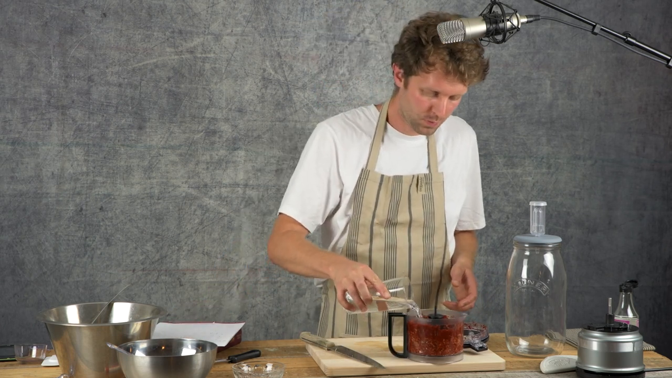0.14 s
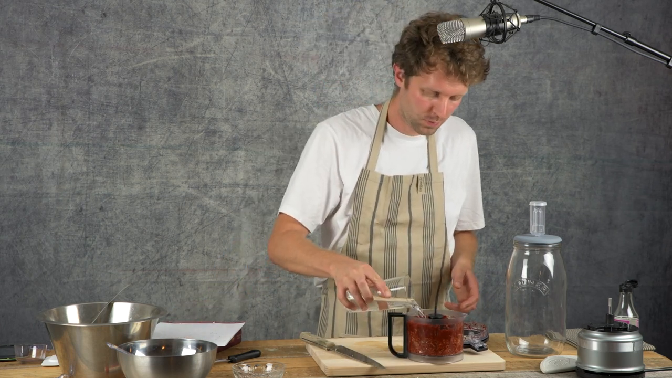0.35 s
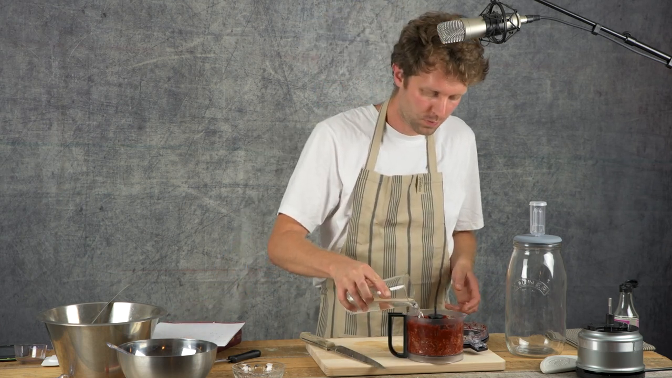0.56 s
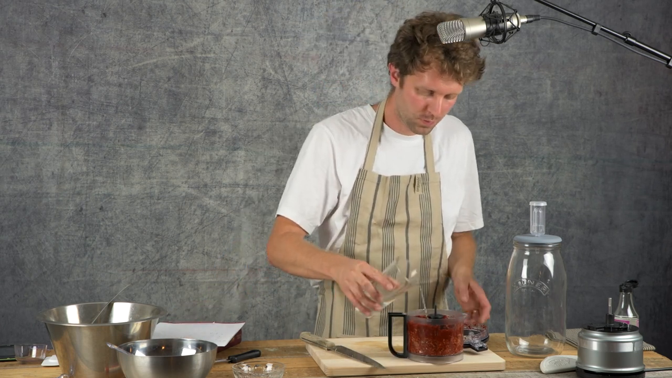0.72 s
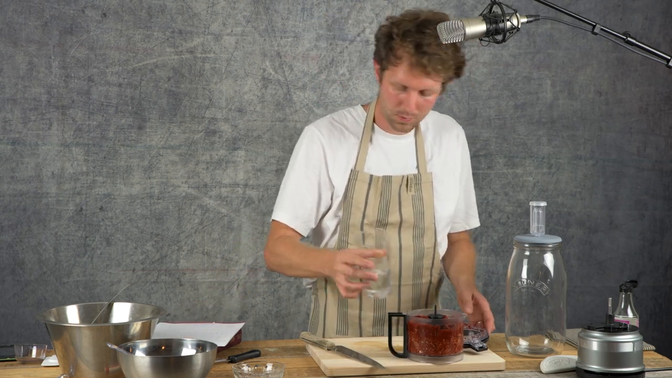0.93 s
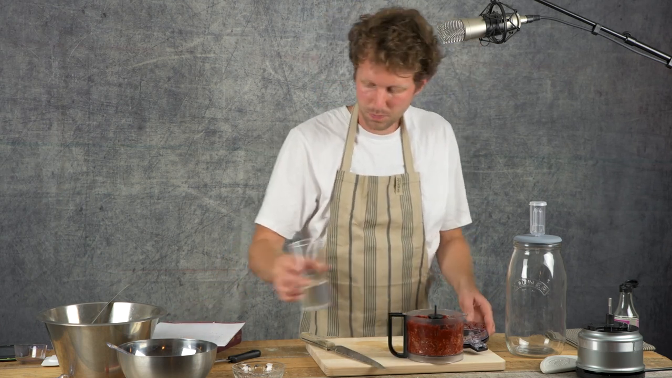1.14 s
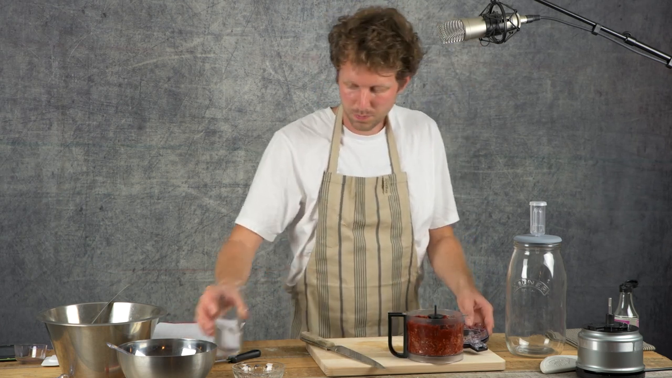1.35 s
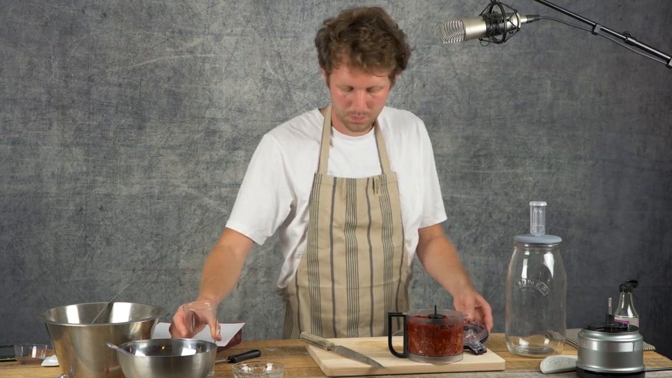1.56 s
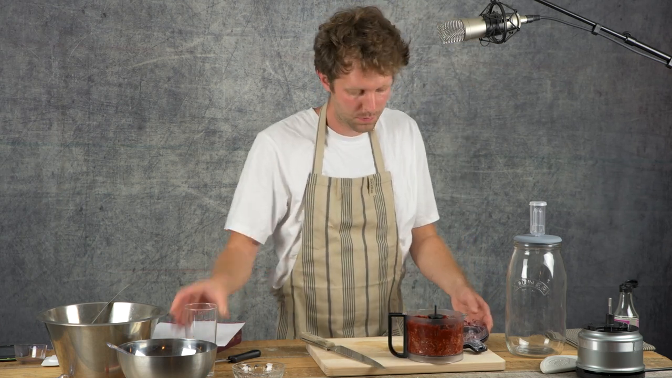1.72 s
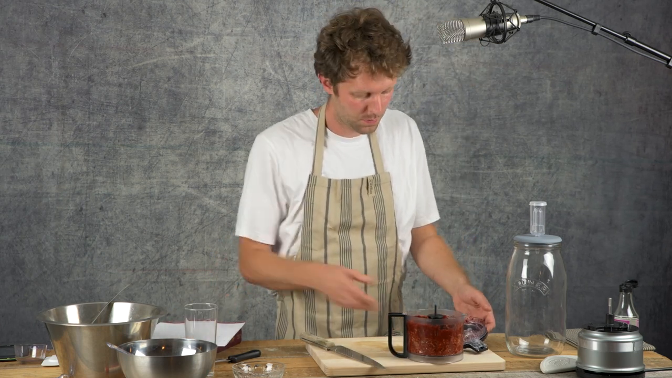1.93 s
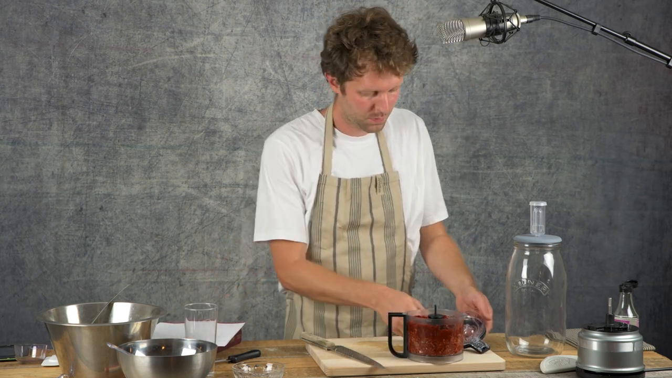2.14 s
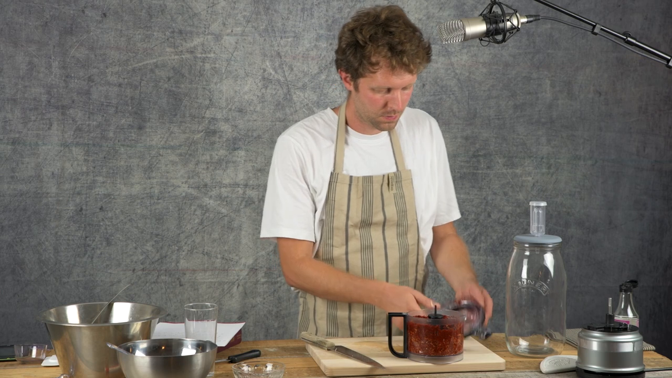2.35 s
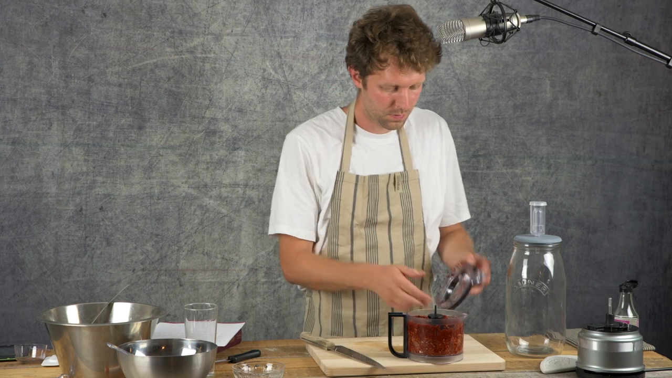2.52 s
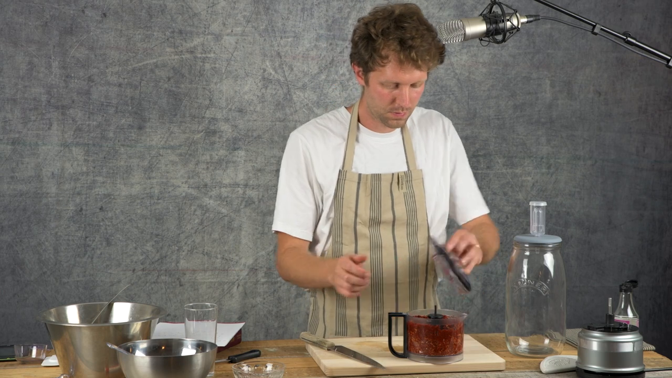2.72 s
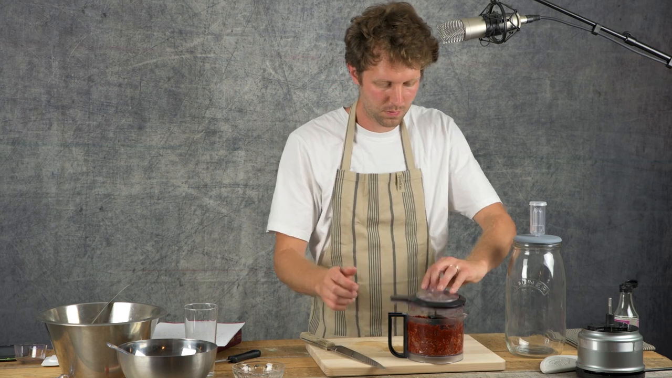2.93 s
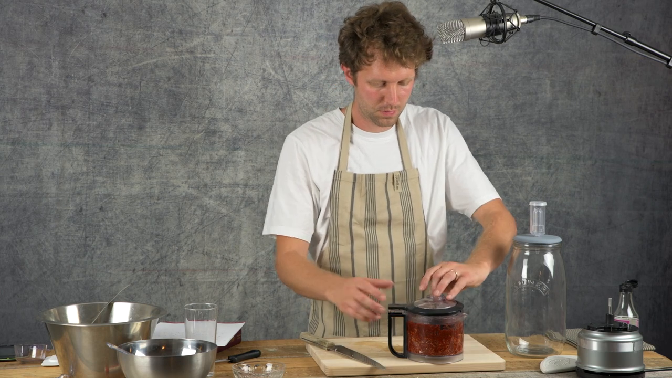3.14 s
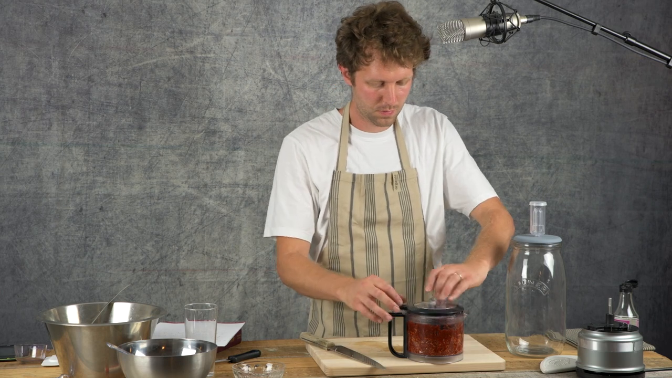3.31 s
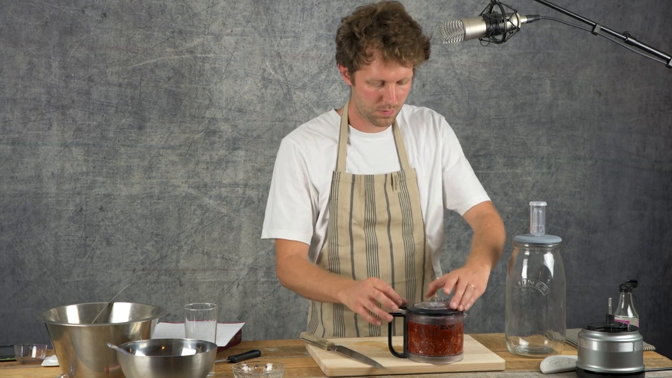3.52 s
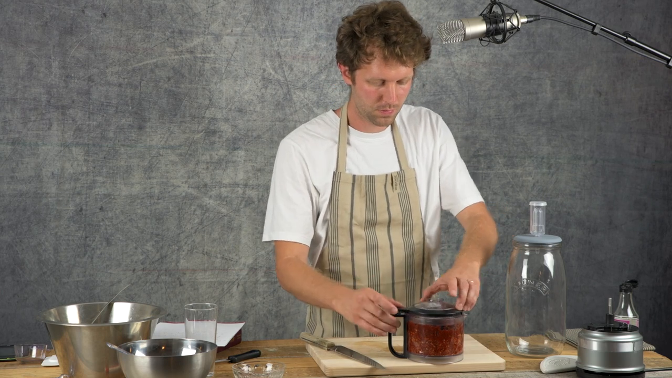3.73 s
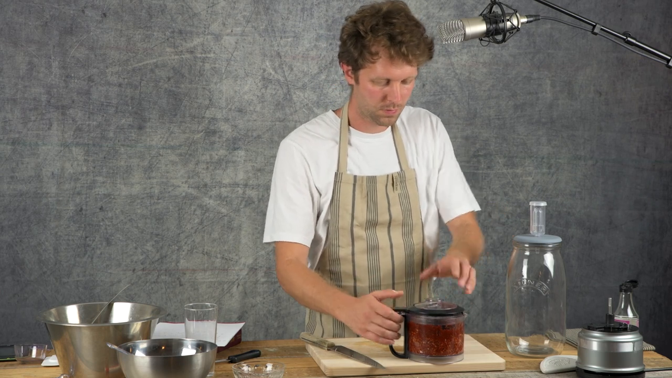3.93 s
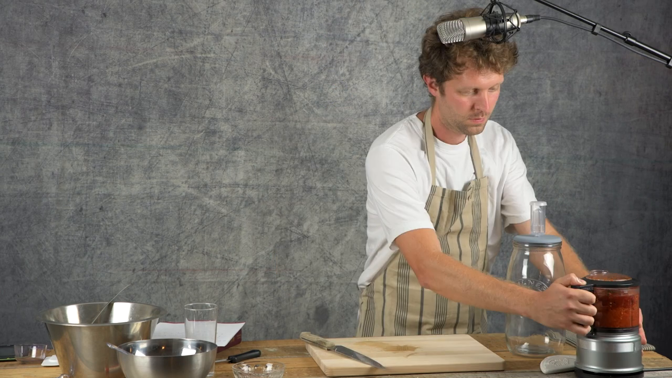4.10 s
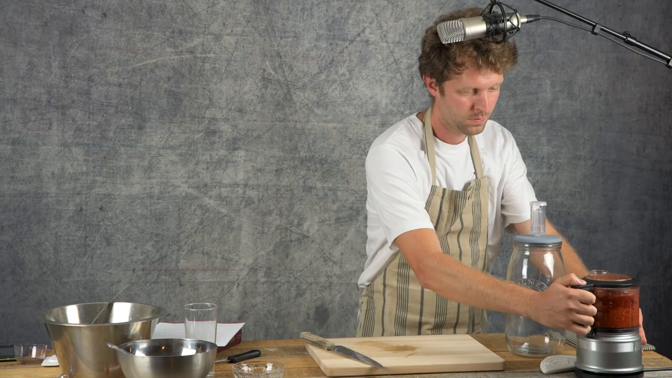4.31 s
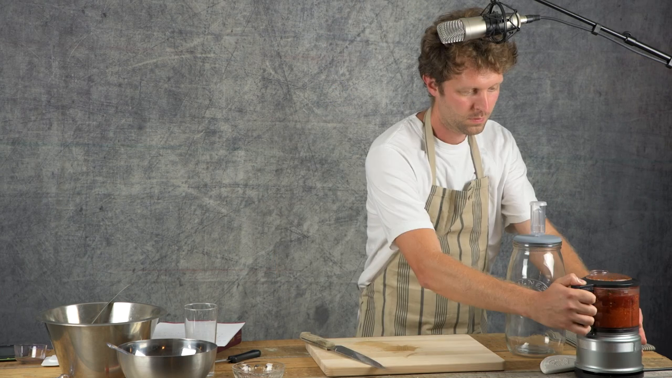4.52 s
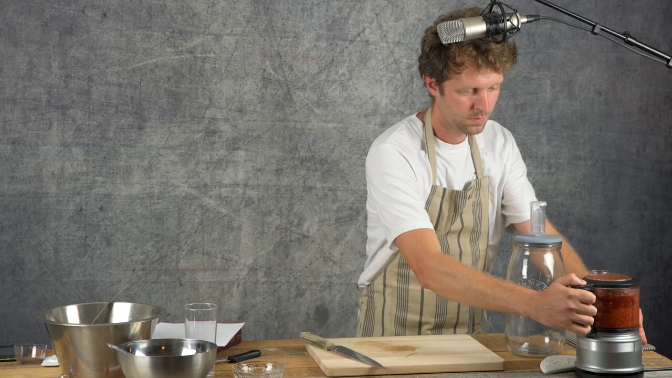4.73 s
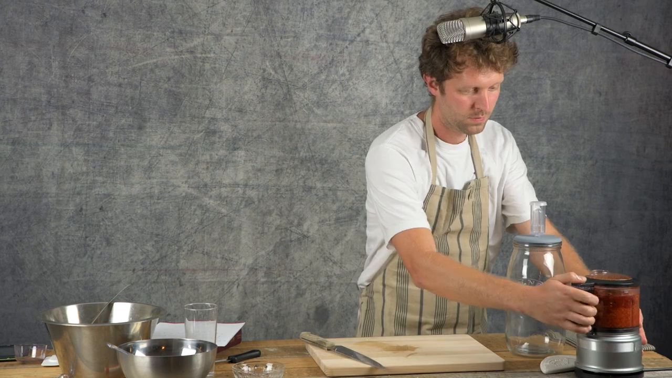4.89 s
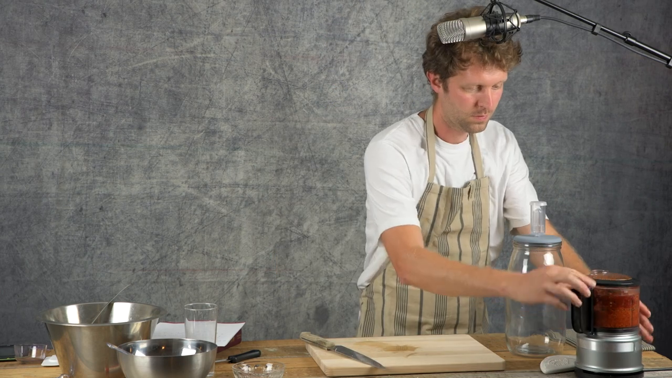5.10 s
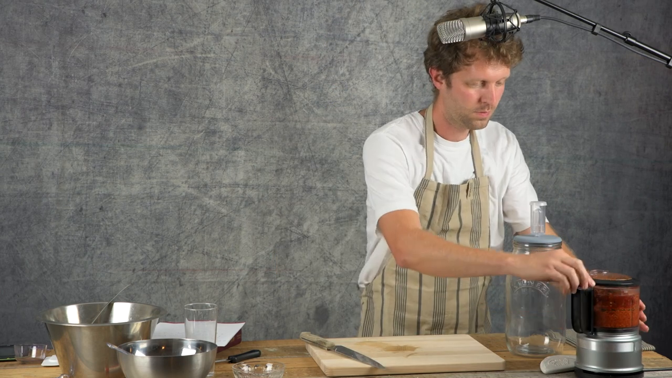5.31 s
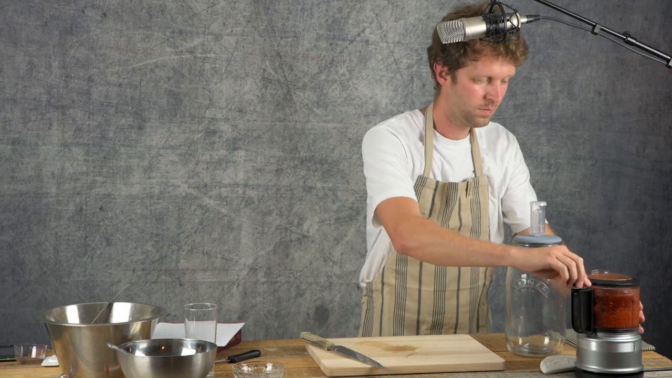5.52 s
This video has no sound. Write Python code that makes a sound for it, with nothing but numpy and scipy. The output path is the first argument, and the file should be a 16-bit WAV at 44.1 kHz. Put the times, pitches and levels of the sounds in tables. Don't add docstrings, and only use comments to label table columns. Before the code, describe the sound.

In a quiet kitchen, drips, glass knocks and plastic lid clacks lead to an abrupt geared motor whir that slows to a stop.

```python
import sys
import numpy as np
from scipy import signal
from scipy.fft import rfft, irfft, next_fast_len
from scipy.io import wavfile
from scipy.ndimage import uniform_filter1d, map_coordinates

SR = 44100
rng = np.random.default_rng(int(sys.argv[2]) if len(sys.argv) > 2 else 0)


def unload_wav(signal):
    wavfile.write(
        sys.argv[1],
        SR,
        np.round(np.clip(np.atleast_2d(signal).T, -1, 1) * 32767).astype(np.int16),
    )


def boost_factor(decibels):
    exponent = np.asarray(decibels, float) / 20
    return 10 ** exponent


N = 244887
CUT_S, OFF_S = 4.172, 5.028

# start in seconds, level in dB, lows over mids in dB, highs over mids in dB.
TABLE_KNOCKS = [
    (1.6685, -35.5, 18.5, -13),
    (1.676, -38, 18, -17),
    (1.683, -39.5, 18.7, -11),
    (1.703, -45.5, 16.6, -14),
    (1.722, -47, 18, -11),
    (1.745, -53.5, 18.5, -13),
    (1.773, -53.5, 16.6, -12),
    (1.795, -56, 15, -9),
]
# start in seconds, level in dB, lows and highs over mids in dB.
LID_KNOCKS = [(3.15, -45, -2, -2), (3.163, -26.5, 4, -11), (3.18, -30.5, 5, -8), (3.202, -30, 1.5, -11),
              (3.225, -49, 19.5, 0), (3.236, -33.5, 2, -10), (3.255, -41, 15, 1), (3.275, -24, 2.5, 0.5),
              (3.329, -52, 1, 9), (3.359, -53, 20.5, 6), (3.395, -57, 16.5, 5)]
# start in seconds, level in dB, lows and highs over mids in dB.
SEATED_KNOCKS = [
    (3.454, -49, 10, -4),
    (3.467, -25, -3.5, -4.5),
    (3.48, -28.5, -1, -10),
    (3.499, -43, 11.5, 1),
    (3.544, -54.5, 11, 7),
    (3.592, -43.5, 3, -11),
    (3.6, -51, 5, -4),
    (3.619, -62.5, 15, 6),
]
# start in seconds, level in dB, lows over mids in dB, highs over mids in dB.
LOCK_KNOCKS = [(3.668, -51.5, 9.5, 4.5), (3.721, -48, 6.5, -15), (3.758, -50, 6.5, -9),
               (3.777, -53.5, 2, -7), (3.812, -45, 4.5, 2.5), (3.829, -30, 5.5, -4.5),
               (3.848, -42.5, 5.5, -8), (3.887, -43, 8, 4), (3.892, -23.5, -2, -5), (3.909, -47.5, 6, -5),
               (3.94, -49, 10.5, -12), (3.96, -49, 13, -8)]


def unit(x):
    return x / np.sqrt(np.mean(np.abs(x) ** 2))


def coloured(points):
    hz, db = np.transpose(points)
    size = next_fast_len(N)
    log_hz = np.log(np.fft.rfftfreq(size, 1 / SR) + 1)
    gain_db = np.interp(log_hz, np.log(hz), db, left=-90, right=-90)
    spectrum = rfft(rng.standard_normal(size)) * boost_factor(gain_db)
    return unit(irfft(spectrum, size)[:N])


def walk(rate_hz):
    steps = uniform_filter1d(rng.standard_normal(N // 16), 2)
    position = np.arange(N) * min(rate_hz, 1300) * 2 / SR
    return map_coordinates(steps, [position], order=1) * np.sqrt(3)


def rough_tone(phase, width_hz):
    return walk(width_hz) * np.sin(phase) + walk(width_hz) * np.cos(phase)


def bandpass(low_hz, high_hz, order):
    return signal.butter(order, [low_hz, high_hz], "bandpass", fs=SR, output="sos")


def ring_down(t, t60_s):
    return np.exp(-np.log(1000) * t / t60_s)


def add(out, start_s, x):
    i = int(start_s * SR)
    out[i:i + len(x)] += x[:N - i]


def background():
    # line in Hz, level in dB.
    hum_lines = [(48.4, -79.5), (95.5, -82), (99.5, -82), (148.5, -74.5), (151.5, -92.5), (199.2, -94.5),
                 (247.6, -84.5), (349.9, -81), (452.2, -87)]
    # frequency in Hz, level in dB.
    hiss_colour = [(25, -32), (45, -10), (70, -7.5), (130, -10), (250, -3.5), (500, -9), (900, -12),
                   (3000, -18.5), (6700, -26), (11000, -32), (12500, -34.5), (16000, -68)]
    t = np.arange(N) / SR
    hum = sum(boost_factor(db + 4 + walk(4)) * np.sin(2 * np.pi * hz * t + k) for k, (hz, db) in enumerate(hum_lines))
    return boost_factor(-68) * coloured(hiss_colour) + hum


def pouring():
    # start in seconds, peak in dB, bubble in Hz, snap over bubble in dB.
    drops = [(0.058, -49.5, 3770, -4.5), (0.0867, -46.5, 4370, -11), (0.089, -50, 2330, -13),
             (0.088, -60, 7740, -17), (0.1042, -46.5, 2010, -10), (0.184, -51, 4720, -13),
             (0.2972, -56, 4080, -13), (0.305, -57, 6500, -8), (0.3272, -38.5, 3100, -15),
             (0.329, -39.5, 4170, -26), (0.362, -60, 9300, -15), (0.3644, -54, 2130, -13),
             (0.372, -47, 7500, -15), (0.3737, -47, 3380, -7), (0.395, -41, 2500, -18),
             (0.398, -55, 5200, -8), (0.4106, -45, 3130, -15), (0.421, -50, 4000, -14),
             (0.4339, -32.5, 3580, -28), (0.435, -37.5, 2250, -23), (0.4456, -36, 2240, -17),
             (0.455, -49, 4800, -12), (0.461, -52, 8000, -3), (0.462, -43.5, 2630, -13),
             (0.4756, -45, 2190, -13), (0.486, -43, 3800, -14), (0.49, -40.5, 4440, -21),
             (0.5127, -43, 3900, -19), (0.517, -56, 5000, -12), (0.5337, -47, 4060, -11),
             (0.5417, -36, 3300, -19), (0.543, -38, 4300, -19), (0.55, -45.5, 2450, -16),
             (0.552, -60, 8200, -12), (0.5744, -68, 3160, -10), (0.591, -62, 5900, -15),
             (0.604, -48, 3800, -15), (0.602, -50, 1610, -17), (0.6174, -60, 4800, -13),
             (0.6394, -55, 3430, -15), (0.674, -57, 7400, -6), (0.8135, -53, 3580, -10),
             (0.941, -69, 1610, 10)]
    # start in seconds, peak in dB, pitch in Hz.
    glugs = [
        (0.544, -54.5, 1020),
        (0.601, -45.5, 956),
        (0.628, -56, 970),
    ]
    out, t = np.zeros(N), np.arange(SR // 20) / SR
    snap_band = bandpass(1600, 6500, 2)
    for start_s, peak_db, hz, snap_db in drops:
        bubble = np.sin(2 * np.pi * hz * t * (1 + 8 * t)) * np.exp(-t * hz / 4) * (1 - np.exp(-t / 0.0004))
        snap = signal.sosfilt(snap_band, rng.standard_normal(len(t)) * np.exp(-t / 0.002))
        add(out, start_s, boost_factor(peak_db) * (bubble + boost_factor(snap_db) * snap / np.abs(snap).max()))
    for start_s, peak_db, hz in glugs:
        swell = np.exp(-t / 0.0074) * (1 - np.exp(-t / 0.0011))
        add(out, start_s, boost_factor(peak_db) * np.sin(2 * np.pi * hz * t) * swell)

    t = np.arange(N) / SR
    start_s, end_s, rise_s, fall_s = 0.31, 0.62, 0.02, 0.055
    flow = np.clip(np.minimum((t - start_s) / rise_s, 1 + (end_s - t) / fall_s), 0, 1)
    splash = coloured([(900, -14), (2200, 0), (3500, 0), (5500, -5), (7500, -14), (10000, -24)])
    splash = splash * boost_factor(4 * walk(500))
    return out + unit(splash) * boost_factor(-66 + 1.5 * walk(10)) * flow


def kitchen(direct, send):
    # frequency in Hz, t60 in seconds, level in dB.
    room = [(60.4, 1, -14), (195, 0.61, -1), (620, 0.49, 0.5), (1800, 0.4, -1.5), (4630, 0.36, -5),
            (11700, 0.26, -10.5)]
    t, tail = np.arange(SR) / SR, 0
    hz, t60_s, db = np.transpose(room)
    for centre_hz in 50 * 2.0 ** np.arange(0, 8.4, 0.5):
        sos = bandpass(centre_hz / 2 ** 0.25, centre_hz * 2 ** 0.25, 2)
        band = signal.sosfilt(sos, rng.standard_normal(SR))
        decay_s = np.interp(np.log(centre_hz), np.log(hz), t60_s)
        level_db = np.interp(np.log(centre_hz), np.log(hz), db)
        tail = tail + boost_factor(level_db) * band * ring_down(t, decay_s) / np.sqrt(decay_s * SR / np.log(1e6))
    tail = tail * (1 - np.exp(-t / 0.00077))
    return direct + signal.fftconvolve(send, tail)[:N]


def knocks(events, body, crack_db, crack_s, top_db, push_s, scatter_db=3, low_hz=270, air_db=-14, detune=0.02,
           loose_rad=1.12, bite_s=0.0014, beam_db=-10, thud_db=-7, size=SR // 8):
    out, t = np.zeros((2, N)), np.arange(size) / SR
    hz, db, t60_s = np.transpose(body)[:, :, None]
    t60_s = np.minimum(t60_s, 70 / hz)
    mode_band = np.digitize(hz[:, 0], [700, 2200, 5500, 10000])
    edges_hz = [(low_hz, 700), (700, 2200), (2200, 5500), (5500, 10000), (10000, 16000)]
    filters = [bandpass(low, high, 3) for low, high in edges_hz]
    for start_s, level_db, weight_db, hard_db in events:
        colour_db = weight_db, 0, hard_db, hard_db + top_db, hard_db + top_db + air_db
        chance = rng.standard_normal((3, len(body), 1))
        contact = rng.standard_normal(size) * np.exp(-t / crack_s) * (1 - np.exp(-t / bite_s)) + 1e-18
        phase = 2 * np.pi * hz * (1 + detune * chance[1]) * t + loose_rad * chance[2]
        modes = boost_factor(db + scatter_db * chance[0]) * np.sin(phase) * ring_down(t, t60_s)
        for k, sos in enumerate(filters):
            ring = signal.sosfilt(sos, modes[mode_band == k].sum(axis=0) * (1 - np.exp(-t / push_s)))
            ring = ring / (np.abs(ring).max() + 1e-18)
            crack = signal.sosfilt(sos, contact)
            crack = boost_factor(crack_db + thud_db * (k == 0)) * crack / np.abs(crack).max()
            gain = boost_factor(level_db + colour_db[k])
            add(out[0], start_s, gain * (ring + crack))
            add(out[1], start_s, gain * (boost_factor(beam_db) * ring + boost_factor(2.5) * crack))
    return out


def glass_tap():
    # start in seconds, level in dB, lows over mids in dB, highs over mids in dB.
    hits = [
        (1.0325, -50, -32, 10.5),
        (1.036, -38.5, -37, -7),
    ]
    # start in seconds, level in dB, lows over mids in dB, highs over mids in dB.
    rebound = [
        (1.11, -50, -14, -25),
    ]
    # mode in Hz, level in dB, t60 in seconds.
    body = [(438, 0, 0.045), (892, 0, 0.047), (975, -2, 0.033), (1130, 11, 0.041), (1210, -8, 0.024),
            (1400, -10, 0.021), (1580, -12, 0.024), (2250, -2, 0.027), (3500, -11, .01), (4080, -1, .016),
            (5070, 12, 0.0078), (6500, 0, 0.0038)]
    tap = knocks(hits, body, crack_db=-5.5, crack_s=0.0041, top_db=-7.5, push_s=0.0014, scatter_db=6,
                 detune=0.004)
    return tap + knocks(rebound, body[:2], crack_db=-16, crack_s=0.003, top_db=-9, push_s=0.002, scatter_db=0)


def glass_handling():
    # start in seconds, level in dB, lows over mids in dB, highs over mids in dB.
    hits = [(1.573, -36.5, -17, 0.5), (1.579, -28, -30, -4), (1.599, -27.5, -18, -15),
            (1.608, -31.5, -12, -5), (1.62, -36.5, -13, -3), (1.757, -38.5, -10, -10.5),
            (2.039, -58, -9, -10), (2.137, -53, -15, -15), (2.196, -36, -17, -8), (2.207, -26, -15.5, -7),
            (2.285, -62, -1, 13), (2.295, -40, -20, -14), (2.618, -84, -2, -4)]
    # mode in Hz, level in dB, t60 in seconds.
    body = [(293, -1.5, 0.027), (478, -2.5, 0.028), (1247, -13, 0.027), (1720, -3.5, 0.021),
            (1775, -0.5, .015), (1950, 4.5, 0.016), (2085, -2, 0.011), (2540, 1.5, 0.013),
            (2870, -3.5, 0.015), (3100, 2.5, 0.012), (3290, 3, 0.013), (3720, -4, 0.0094),
            (4600, -7, 0.005), (7700, 0, .01)]
    return knocks(hits, body, crack_db=-12, crack_s=0.0057, top_db=-32, push_s=0.0057, bite_s=0.0027,
                  beam_db=-8)


def table_thuds():
    # mode in Hz, level in dB, t60 in seconds.
    body = [(120, -33, 0.28), (248, -1, 0.04), (305, 4, 0.035), (375.5, 2, 0.03), (430, 0, 0.025),
            (476, -3.5, 0.025), (549, -2, 0.025), (668, 0, 0.035), (764, 4, 0.07), (866, 1, 0.05),
            (1040, -9, 0.03), (1440, -16, 0.012), (2770, 0, 0.011), (5900, 0, 0.0042)]
    return knocks(TABLE_KNOCKS, body, crack_db=-5, crack_s=0.014, top_db=-25, push_s=0.00052, scatter_db=4,
                  low_hz=173, loose_rad=0.15, detune=0.0073, beam_db=-3, size=SR // 4)


def worktop_sway(events, level_db, rise_s):
    # mode in Hz, level in dB, t60 in seconds.
    bending = [(60, -10, 0.65), (77.3, 0, 1), (104.3, -1, 0.74), (121.7, 6, 0.59)]
    blows, t = np.zeros(N), np.arange(SR) / SR
    for start_s, peak_db, lows_db, *_ in events:
        add(blows, start_s, [boost_factor(peak_db + lows_db + level_db)])
    sway = sum(boost_factor(db) * np.sin(2 * np.pi * hz * t) * ring_down(t, t60_s) for hz, db, t60_s in bending)
    return signal.fftconvolve(blows, sway * (1 - np.exp(-t / rise_s)))[:N]


def rim_tick():
    # start in seconds, level in dB, lows over mids in dB, highs over mids in dB.
    hits = [
        (2.426, -41.5, -19, 4.9),
    ]
    # mode in Hz, level in dB, t60 in seconds.
    body = [(693.3, 0, 0.027), (1765, 3.5, 0.011), (1870, -0.5, 0.023), (2500, 6, 0.011),
            (2860, 3.5, 0.022), (3475, 0, 0.017), (6700, 1, .012), (6950, 2, .012), (7670, 4, .01)]
    return knocks(hits, body, crack_db=-11, crack_s=0.0055, top_db=-8, push_s=0.0013, air_db=-22, beam_db=-5.5)


def loose_lid():
    # mode in Hz, level in dB, t60 in seconds.
    body = [(297, -1.5, 0.04), (414, 5.5, 0.051), (497, -0.5, 0.049), (547, -2.5, 0.056), (861, 0, 0.055),
            (1004, 3.5, 0.024), (1910, 0, 0.024), (2860, -2, 0.02), (3580, 0, 0.014), (4440, 0, 0.0062),
            (7700, 0, 0.0029)]
    return knocks(LID_KNOCKS[:7], body, crack_db=-5, crack_s=0.0066, top_db=-19, push_s=0.0015, scatter_db=1.5,
                  loose_rad=0.54, bite_s=0.00052)


def resting_lid():
    # start in seconds, level in dB, lows over mids in dB, highs over mids in dB.
    switch = [
        (4.16, -64, -17, 3.9),
        (5.278, -66, -8, 25),
    ]
    # mode in Hz, level in dB, t60 in seconds.
    body = [(225, -3, 0.074), (290, 0.5, 0.045), (367, 4, 0.074), (426, 8, 0.026), (580, -6.5, 0.052),
            (810, -7.5, 0.044), (970, 6, 0.026), (1240, -2, 0.024), (1940, 6, 0.024), (3100, 3, 0.045),
            (3350, 5, 0.02), (4050, 6.5, 0.018), (5600, -17, 0.0062), (8100, 1, 0.0029)]
    return knocks(LID_KNOCKS[7:] + switch, body, crack_db=-2.5, crack_s=0.0067, top_db=-17, push_s=0.0016,
                  low_hz=202, bite_s=0.0012)


def seated_lid():
    # mode in Hz, level in dB, t60 in seconds.
    body = [(217, -3.5, 0.058), (296, 0, 0.069), (362, 0, 0.045), (398, -10.5, 0.084), (637, -15, 0.019),
            (828.5, -9.5, 0.073), (1100, -2, 0.018), (1290, -4, 0.02), (1860, -1.5, 0.046),
            (1950, 1, 0.019), (2820, 1, 0.02), (3300, 1, .012), (4100, 0, 0.0088), (5399, -9, 0.0068)]
    return knocks(SEATED_KNOCKS, body, crack_db=-5, crack_s=0.0071, top_db=-27, push_s=0.0011, scatter_db=0.5,
                  low_hz=187, detune=0.0057, bite_s=0.00049, beam_db=-9.5)


def locked_lid():
    # mode in Hz, level in dB, t60 in seconds.
    body = [(212, -4, 0.06), (287.5, 1, 0.07), (342, 2, 0.056), (428, 0, 0.053), (590, -10, .03),
            (706, -1, 0.032), (970, -11, 0.03), (1270, 2, 0.015), (1897, 0, 0.028), (2440, -4, 0.02),
            (2930, 1, 0.016), (3300, -1, 0.011), (4060, -1, 0.018), (5200, -4, 0.0074)]
    return knocks(LOCK_KNOCKS, body, crack_db=0.5, crack_s=0.0051, top_db=-13.5, push_s=0.00039, scatter_db=1,
                  low_hz=185, loose_rad=0.97, bite_s=0.0007)


def scene_cut():
    gate = np.clip((np.arange(N) / SR - CUT_S) / 0.00003, 0, 1)
    click = boost_factor(-29) * np.diff(np.diff(gate, prepend=0), prepend=0)
    return gate, click


def gear_whine(speed, turn):
    # frequency in Hz, level in dB.
    gear_lines = [(1125, -47), (1319, -41.5), (1531, -42.5), (1610, -55), (1681, -57), (2174, -37),
                  (2212, -42), (2294, -47.5), (2355, -35), (2433, -46), (2541, -44), (2573, -53),
                  (2613, -36.5), (2674, -52), (2772, -39)]
    # frequency in Hz, width in Hz, level in dB.
    mesh = [(1263, 260, -57), (2230, 400, -14), (2630, 300, -5), (4950, 790, -8), (5350, 410, -9.5),
            (7470, 1100, -15), (10370, 3200, -28.5)]
    # frequency in Hz, width in Hz, level in dB.
    case = [(1250, 300, 1), (1580, 160, 8), (2150, 350, 7)]
    slow = 1 - speed
    lines = sum(boost_factor(db + 3 * walk(12)) * np.sin(hz * turn + 0.5 * walk(15)) for hz, db in gear_lines)
    teeth = np.zeros(N)
    for hz, width_hz, db in mesh:
        softening = speed ** (hz / 2400)
        teeth += boost_factor(db) * softening * boost_factor(6.9 * slow * walk(30)) * rough_tone(hz * turn, width_hz)
    teeth = teeth + sum(boost_factor(db) * signal.lfilter(*signal.iirpeak(hz, hz / width_hz, SR), teeth)
                        for hz, width_hz, db in case)
    slack = boost_factor(4 * slow * walk(40))
    whine = slack * (unit(teeth) + boost_factor(-3 - 28 * slow) * unit(lines))
    return signal.sosfilt(signal.butter(3, 1050, "highpass", fs=SR, output="sos"), whine)


def bowl_shell(slow):
    level_db = -15 + 25.4 * slow - 40 * slow ** 7 + 1.1 * walk(25)
    return boost_factor(level_db) * rough_tone(2 * np.pi * 1297 * np.arange(N) / SR, 180)


def motor():
    # frequency in Hz, density in dB per Hz.
    housing = [(470, -55), (800, -31), (1020, -32), (1310, -4.5), (1860, -2.5), (2600, -5.5), (3570, -14),
               (5350, -16), (6200, -16), (7640, -27), (8960, -33), (12000, -42.5), (15000, -55)]
    # frequency in Hz, density in dB per Hz.
    base = [(25, -28), (50, -17), (90, -15), (167, -14.5), (283, 2.5), (338, -6.5), (532, -3.5), (625, -9),
            (683, -0.5), (814, -11.5), (1000, -8.5), (1300, -13)]
    t = np.arange(N) / SR
    drag_s, friction = 0.395, 0.21
    speed = np.clip((1 + friction) * np.exp(-(t - OFF_S) / drag_s) - friction, 0, 1)
    slow = 1 - speed
    flutter = 1 + 0.001 * walk(6) + 0.07 * slow * walk(30)
    turn = 2 * np.pi * np.cumsum(speed * flutter) / SR

    whine_db = -33.5 - 30 * slow ** 2.7
    rattle_db = -36 - 37.5 * slow ** 2.93
    rumble_db = -42.5 - 35 * slow ** 4.66

    power = np.clip((OFF_S - t) / 0.015, 0, 1)
    mains = power * np.sin(2 * np.pi * 120.3 * t)
    throb = (1 + 0.086 * mains) * (1 + 0.051 * np.sin(40.3 * turn + 1.1 * walk(9)))

    whine = boost_factor(whine_db) * gear_whine(speed, turn)
    rattle = boost_factor(rattle_db) * (coloured(housing) * boost_factor(walk(200)) + bowl_shell(slow))
    rumble = boost_factor(rumble_db + 0.8 * walk(20)) * coloured(base)
    buzz = boost_factor(-54.5 + 1.4 * walk(5)) * mains
    return throb * (whine + rattle) + rumble + buzz


def scene():
    pour = pouring()
    tap, glass, table, rim = glass_tap(), glass_handling(), table_thuds(), rim_tick()
    lid = loose_lid() + resting_lid() + seated_lid() + locked_lid()
    sway = worktop_sway(TABLE_KNOCKS[:3], level_db=-31.5, rise_s=0.0077)
    sway = sway + worktop_sway(LID_KNOCKS + SEATED_KNOCKS + LOCK_KNOCKS, level_db=-30, rise_s=0.08)
    gate, click = scene_cut()
    direct = pour + (tap + glass + table + lid + rim)[0]
    send = boost_factor(-2) * table + boost_factor(-0.5) * lid + boost_factor(1.5) * glass + boost_factor(0.5) * tap + rim
    send = send[1] + boost_factor(-8) * pour
    mix = click + kitchen(direct, send) + sway + gate * motor() + background()
    return mix[None]


def band_limit(x):
    return signal.sosfilt(signal.butter(12, 16750, fs=SR, output="sos"), x)


def record(dry):
    mix = signal.sosfilt(signal.butter(2, 45, "highpass", fs=SR, output="sos"), dry)
    return band_limit(mix)


dry = scene()
out = record(dry)
unload_wav(out)
```